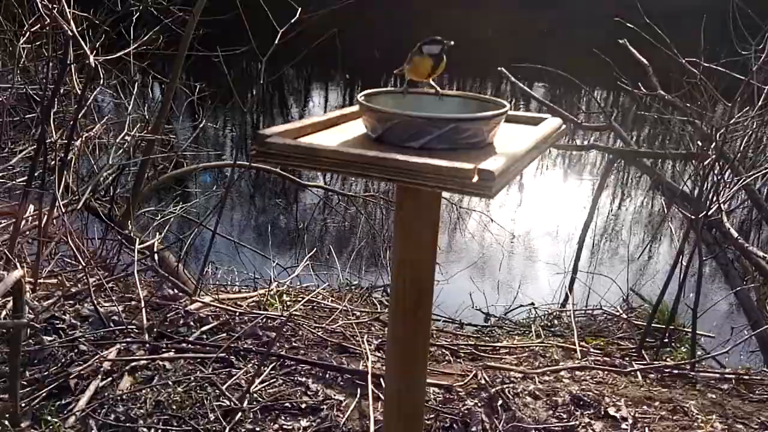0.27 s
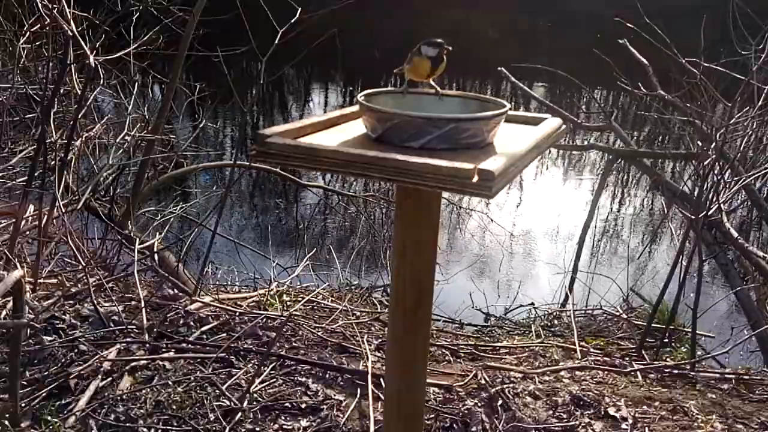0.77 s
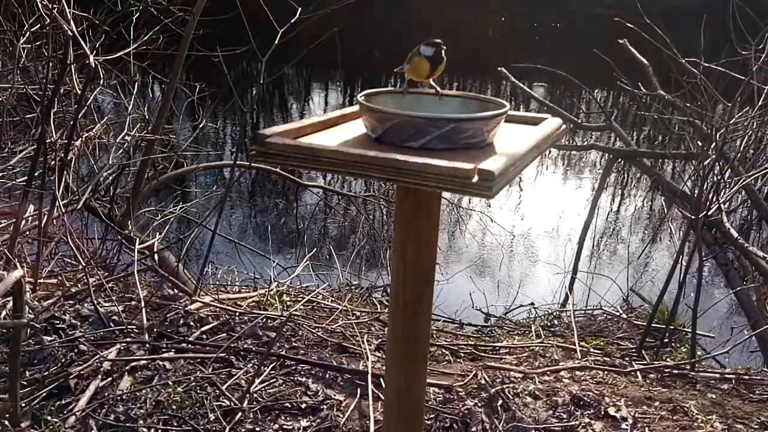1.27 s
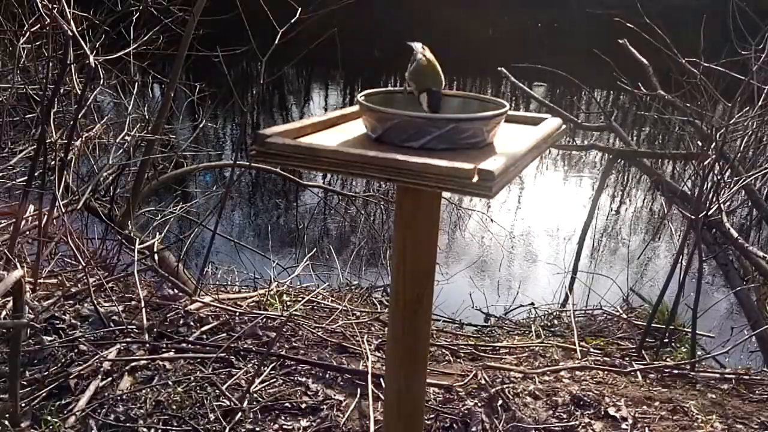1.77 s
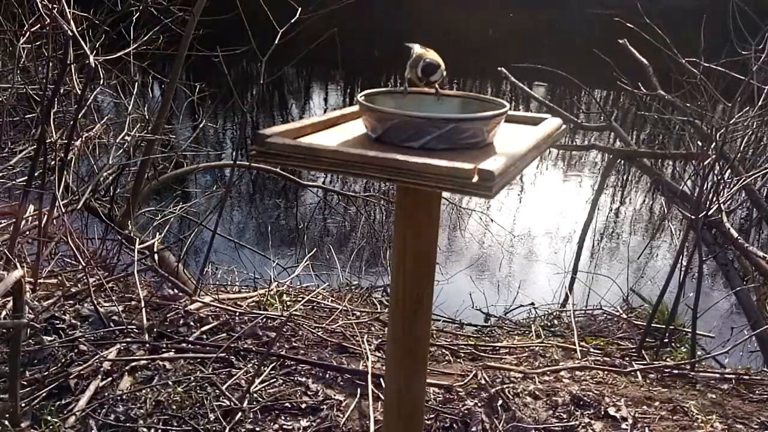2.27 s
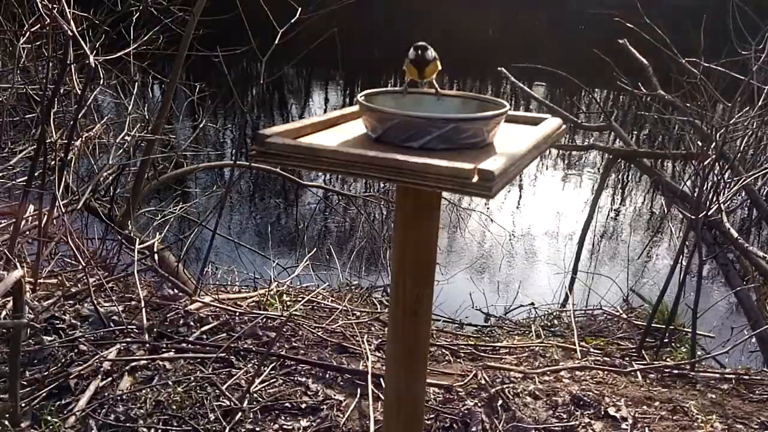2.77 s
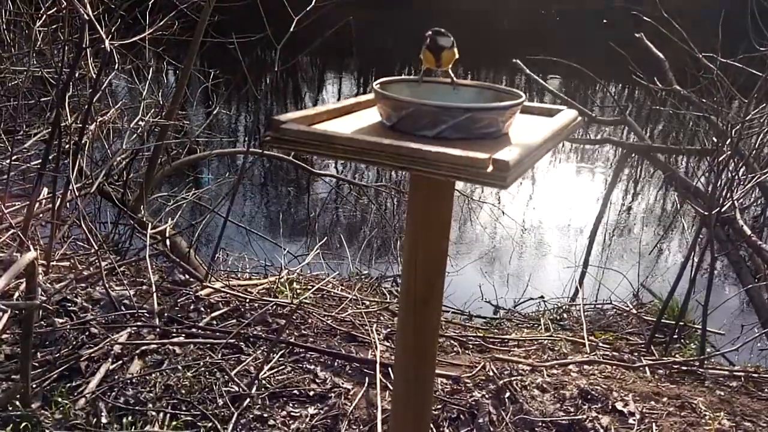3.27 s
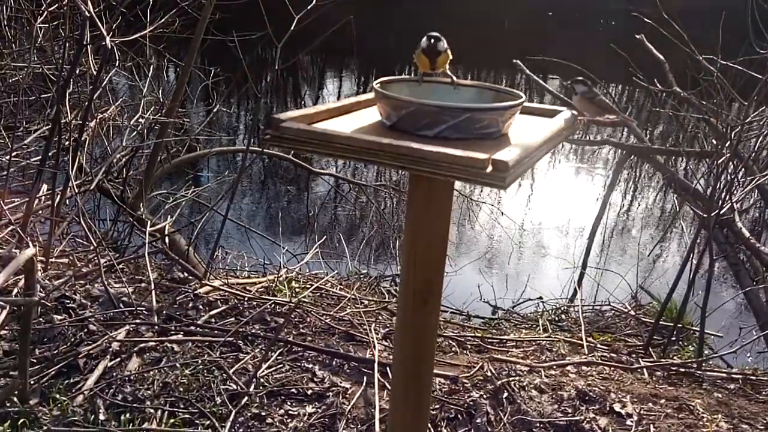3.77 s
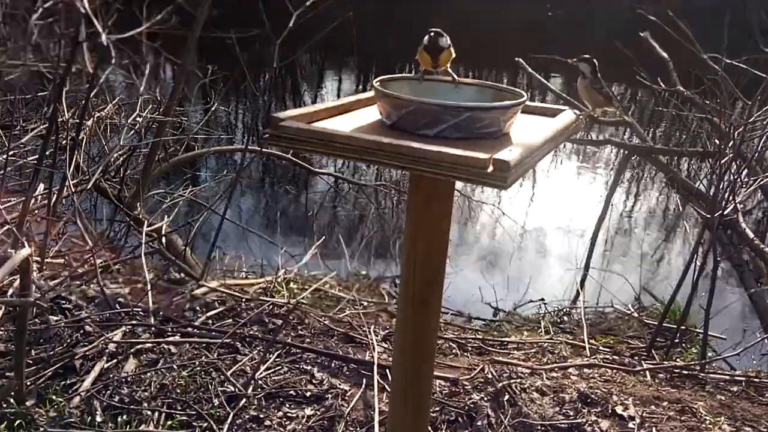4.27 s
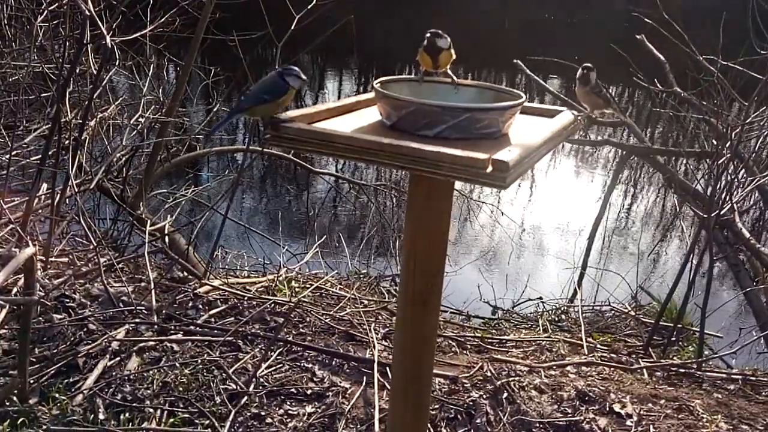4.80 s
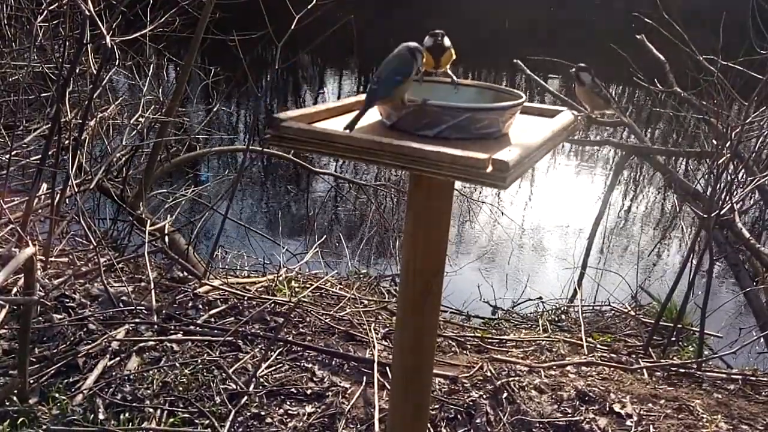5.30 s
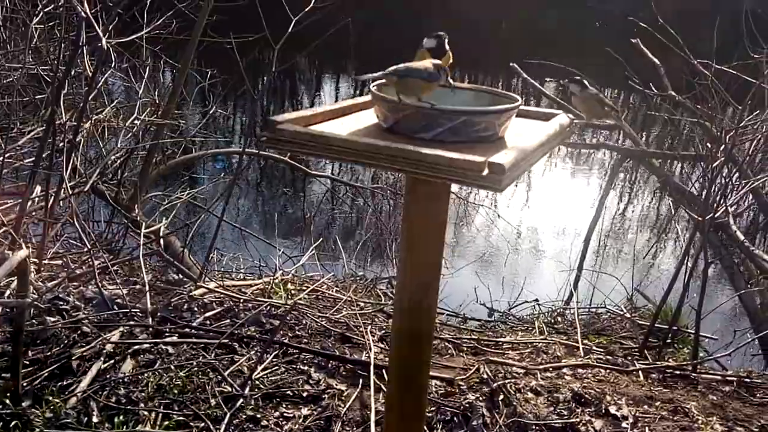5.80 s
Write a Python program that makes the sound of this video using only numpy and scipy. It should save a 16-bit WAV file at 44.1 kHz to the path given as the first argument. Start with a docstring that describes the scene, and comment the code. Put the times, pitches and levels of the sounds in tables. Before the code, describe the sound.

Outdoors by water, a steady, distant low roar lies beneath everything. Faint thin bird calls slur downward from far bushes during the first second. Near three seconds a close wing flutter thumps the microphone and taps ring a seed-filled bowl. Softer wings stir in twigs, a clear chirp follows, then ticking claws and a dense, loud burst of feather snaps and air thuds end it.

```python
"""A wooden feeder with a ceramic seed bowl beside a river, visited by small birds.
Twice a bird flutters close by: feathers snap and rustle as dense clicks through damped resonances,
and wing wash thumps the microphone with single puffs and noisy eddies.
Beaks and claws tick on seed and ring the modes of the bowl; gliding tones make a few thin calls.
Softer wings stir among the twigs, over a distant outdoor roar of shaped noise."""
import sys
import numpy as np
from scipy import signal
from scipy.fft import rfft, irfft
from scipy.io import wavfile
from scipy.ndimage import uniform_filter1d

SR = 44100
rng = np.random.default_rng(int(sys.argv[2]) if len(sys.argv) > 2 else 0)


def unload_wav(signal):
    """Save mono or channel-first audio to the path in sys.argv[1] as 16-bit WAV at rate SR, clipped to [-1, 1]."""
    wavfile.write(
        sys.argv[1],
        SR,
        np.round(np.clip(np.atleast_2d(signal).T, -1, 1) * 32767).astype(np.int16),
    )


N = 266672
TIME = np.arange(N) / SR


def amp(db):
    """Decibels to gain."""
    return 10 ** (np.asarray(db) / 20)


def unit(x):
    """Scales to rms 1."""
    return x / np.sqrt(np.mean(x ** 2) + 1e-20)


def smooth_noise(shape, size, axis=-1):
    """Noise slowed down by a moving average over size samples."""
    return uniform_filter1d(rng.standard_normal(shape), size=size, axis=axis)


def spectrum(points, hz):
    """Reads a spectrum in dB on a log-frequency axis."""
    point_hz, db = np.transpose(points)
    return np.interp(np.log(hz + 1), np.log(point_hz), db)


def colour(x, points):
    """Gives a signal a spectrum, at rms 1."""
    gain = amp(spectrum(points, np.fft.rfftfreq(len(x), 1 / SR)))
    return unit(irfft(rfft(x) * gain, len(x)))


def band(hz, width_hz):
    """A bell-shaped band of noise, at rms 1."""
    f = np.fft.rfftfreq(N, 1 / SR)
    bell = np.exp(-((f - hz) / width_hz) ** 2)
    return unit(irfft(rfft(rng.standard_normal(N)) * bell, N))


def add(mix, start_s, sound):
    """Mixes a sound in at a time."""
    part = mix[max(round(start_s * SR), 0):][:len(sound)]
    part += sound[:len(part)]


def thicket(x, t60_s):
    """Sparse echoes scattered back from twigs and ground."""
    t = np.arange(SR // 2) / SR
    hits = rng.random(len(t)) < 2500 / SR  # about 2500 echoes a second
    echoes = rng.standard_normal(len(t)) * hits * amp(-60 * t / t60_s) * (t > .004)
    return signal.fftconvolve(x, echoes / np.linalg.norm(echoes))[:N]


def strokes(rows, drop_db=20, roundness=1.34):
    """Each stroke swells to its peak and fades; swell_s and fade_s are the times to change by drop_db."""
    power = np.full(N, 1e-16)
    for peak_s, level_db, swell_s, fade_s in rows:
        away = np.maximum((peak_s - TIME) / swell_s, (TIME - peak_s) / fade_s)
        # roundness 1 gives a pointed peak, 2 a bell
        power += amp(level_db - drop_db * np.minimum(away, 10) ** roundness) ** 2
    return np.sqrt(power)


def rustle(rows, points, grain_db, grains_per_s, flick_db, patchy_db=3.5):
    """Surfaces catch and slip: dense uneven clicks, clumped into flicks that each favour other pitches."""
    flicks = unit(uniform_filter1d(smooth_noise(N, 200), size=200))
    uneven_db = grain_db * np.minimum(rng.exponential(1, N), 4)
    size = amp(uneven_db + flick_db * np.clip(flicks, -2, 2))
    slips = rng.standard_normal(N) * size * (rng.random(N) < grains_per_s / SR)
    # patches in time and frequency colour the flicks differently
    z = signal.stft(slips, nperseg=256)[2]
    patches = unit(uniform_filter1d(smooth_noise(z.shape, 4, axis=0), size=7, axis=1))
    slips = signal.istft(z * amp(patchy_db * patches), nperseg=256)[1][:N]
    return strokes(rows) * colour(slips, points)


# tone of the distant roar and low rumble: pitch_hz [Hz], relative density_db [dB per Hz]
ROAR_COLOUR = [(20, -11), (35, -12.5), (62, 2), (100, -2), (160, -11.5), (340, -18), (600, -15),
               (1000, -14.5), (1800, -23), (3000, -43), (4200, -47), (6200, -50), (8200, -61),
               (13800, -63.5)]
# slow drift of the roar: time_s [s], gain_db [dB]
ROAR_SWELL = [(0, -1), (1.9, 0.5), (3.5, 0), (6.05, -2)]


def background(roar_db=-45.5, drone_hz=485, drone_db=-60, hiss_db=-91):
    """A far roar with a faint drone in it, and a thin hiss at the very top, all shaped from noise."""
    roar = amp(roar_db) * colour(rng.standard_normal(N), ROAR_COLOUR)
    drone = amp(drone_db) * band(drone_hz, 28)
    time_s, gain_db = np.transpose(ROAR_SWELL)
    swell = amp(np.interp(TIME, time_s, gain_db))
    return swell * (roar + drone) + amp(hiss_db) * band(15000, 650)


# thin falling calls from the far bushes: start_s [s], length_s [s], start_hz [Hz], end_hz [Hz],
# level_db [dB], echo_db [dB against the call]
FAR_CALLS = [(0.059, 0.0046, 7800, 5300, -68.5, 4), (.07, .11, 8700, 8400, -92, -8),
             (.16, .025, 8350, 7360, -81, -3), (0.287, .11, 8260, 8040, -88, -4),
             (0.469, .055, 6900, 5480, -75.5, 3.5), (0.608, 0.042, 6380, 5130, -74, 1),
             (0.736, 0.053, 6400, 4410, -77, 3.5), (.79, 0.037, 5600, 5500, -81, 0),
             (4.322, 0.037, 5020, 4930, -75, -10)]


def far_calls(waver=0.019):
    """Short, slightly unsteady downward slurs; the deeper in the bushes, the more echo."""
    out = np.zeros(N)
    for start_s, length_s, start_hz, end_hz, level_db, echo_db in FAR_CALLS:
        hz = np.geomspace(start_hz, end_hz, int(length_s * SR))
        hz = hz * (1 + waver * unit(smooth_noise(len(hz), 60)))
        tone = np.sin(2 * np.pi * np.cumsum(hz) / SR)
        note = amp(level_db) * unit(tone * signal.windows.tukey(len(hz), .4))
        add(out, start_s, note)
        add(out, start_s, amp(echo_db) * thicket(note, t60_s=0.39))
    return out


# birds fluttering among the twigs: peak_s [s], level_db [dB], swell_s [s], fade_s [s]
TWIG_STROKES = [(2.80, -68.5, 0.16, 0.11), (3.53, -53.5, 0.012, 0.038), (3.57, -68.5, .03, .21),
                (4.343, -70, .028, .025), (4.667, -61, .028, .045), (4.81, -73, .04, .06)]
# tone of those wings: pitch_hz [Hz], relative density_db [dB per Hz]
TWIG_COLOUR = [(500, -23), (2500, 3), (5200, -2.5), (7000, 2.5), (8500, -16), (13000, -19), (15000, -16.5),
               (16500, -10)]


def twig_flutter():
    """Wings farther off among the twigs: a softer, smoother run of feather slips."""
    return rustle(TWIG_STROKES, TWIG_COLOUR, grain_db=2.0, grains_per_s=13000, flick_db=3.5)


# near calls: start_s [s], length_s [s], start_hz [Hz], held_hz [Hz],
# end_level_db [dB, before gate and off-note loss], overtone_boost_db [dB]
NEAR_CALLS = [(4.62, .021, 6280, 6230, -44, -5), (4.637, 0.011, 6500, 7000, -53, -6),
              (4.644, 0.018, 4400, 3560, -52.5, 9), (4.775, 0.072, 2700, 4183, -39.5, -0.5)]
# partials of a near call: multiple [times the pitch], relative level_db [dB, before the boost]
CALL_PARTIALS = [(1, 1), (2, -15), (3, -25)]


def near_calls(waver=0.0041, glide_s=0.0048, sag_hz_per_s=1750,
               attack_s=.002, swell_db_per_s=110, release_s=0.0078):
    """Clean whistles with overtones: each slides onto its note, swells and sags."""
    out = np.zeros(N)
    for start_s, length_s, start_hz, held_hz, end_level_db, boost_db in NEAR_CALLS:
        t = np.arange(0, length_s, 1 / SR)
        glide = (start_hz - held_hz) * np.exp(-(t / glide_s) ** 2)
        hz = held_hz + glide - sag_hz_per_s * t
        hz = hz * (1 + waver * unit(smooth_noise(len(t), 100)))
        phase = 2 * np.pi * np.cumsum(hz) / SR
        tone = np.zeros(len(t))
        for multiple, level_db in CALL_PARTIALS:
            gain = amp(level_db + boost_db * (multiple > 1))
            beak_loss = 1 + (multiple * hz / 11500) ** 12  # the beak radiates little above 11 kHz
            tone += gain * np.sin(round(multiple) * phase) / beak_loss
        gate = np.minimum(t / attack_s, 1) * np.minimum((length_s - t) / release_s, 1)
        off_note_db = -22 * abs(np.log2(hz / held_hz))  # the throat is tuned to the held note
        swell_db = swell_db_per_s * (t - length_s)
        add(out, start_s, amp(end_level_db + off_note_db + swell_db) * gate * unit(tone))
    return out


# taps on the bowl: start_s [s], drive_db [dB], drive_hz [Hz around which the contact drives it most]
BOWL_TAPS = [(3.0010, -27, 6340), (3.0012, -34.5, 3060), (3.0412, -33.5, 4900), (3.0408, -39.5, 2100),
             (3.0738, -37, 4800)]
# modes of the seed-filled bowl: mode_hz [Hz], relative mode_db [dB], t60_s [s]
BOWL_MODES = [(2130, -0.5, 0.048), (2659, -3, .032), (3060, 1.5, 0.016), (4780, -6.5, 0.025),
              (5760, 1.5, 0.01), (6400, 1.5, 0.006)]


def bowl(focus_db_per_octave=30, rise_s=0.0004):
    """Taps ring the modes of the bowl, damped by the seed; each contact favours other modes."""
    out, t = np.zeros(N), np.arange(SR // 10) / SR
    for start_s, drive_db, drive_hz in BOWL_TAPS:
        ring = np.zeros(len(t))
        for mode_hz, mode_db, t60_s in BOWL_MODES:
            off_drive_db = focus_db_per_octave * abs(np.log2(mode_hz / drive_hz))
            ring += amp(mode_db - off_drive_db - 60 * t / t60_s) * np.sin(2 * np.pi * mode_hz * t)
        add(out, start_s, amp(drive_db) * ring * (1 - np.exp(-t / rise_s)))
    return out


# single puffs of wing wash on the microphone: centre_s [s], peak_db [dB, before the port], pitch_hz [Hz]
WASH_PUFFS = [(2.9020, -29, 70), (2.9374, -10.5, 105), (2.9706, -12, 340), (2.9875, -12, 95),
              (3.0215, -24, 70), (5.9875, -14, 90), (6.0445, -14, 120)]
# gusts of eddies thrown at the microphone: peak_s [s], level_db [dB], swell_s [s], fade_s [s]
WASH_GUSTS = [(2.94, -29.5, 0.047, 0.043), (2.971, -19, .011, .034), (3.008, -30, .02, 0.057),
              (3.10, -37, .02, 0.049), (5.91, -33.5, 0.15, 0.15), (5.988, -21, 0.031, 0.1),
              (6.04, -19.5, 0.042, 0.15)]


def wing_wash(low_hz=82, front=2.34, rest_hz=80, hz_per_gain=3760, port_hz=(44.5, 640)):
    """Each puff is a push that flips steeply into a pull; eddies are brighter when the air moves faster."""
    speed = strokes(WASH_GUSTS)
    edge_hz = rest_hz + hz_per_gain * speed
    eddies, puffs = np.zeros(N), np.zeros(N)
    for hz in np.geomspace(low_hz, 1400, num=10):
        eddies += band(hz, hz / 3) / np.sqrt(1 + (hz / edge_hz) ** 7)
    even_eddies = eddies / np.sqrt(uniform_filter1d(eddies ** 2, size=800))
    for centre_s, peak_db, pitch_hz in WASH_PUFFS:
        u = 2 * np.pi * pitch_hz * (TIME - centre_s)
        puff = -np.tanh(front * u) * np.exp(-u ** 2 / 2)
        puffs += amp(peak_db) * puff / abs(puff).max()
    # the microphone passes no steady pressure, and the front of a puff is blunt
    port = signal.butter(2, port_hz, "bandpass", fs=SR, output="sos")
    return signal.sosfilt(port, puffs) + speed * even_eddies


# strokes of close wings: peak_s [s], level_db [dB], swell_s [s], fade_s [s]
CLOSE_STROKES = [(2.885, -63, 0.03, 0.1), (2.944, -39.5, 0.014, 0.02), (3.0, -60.5, .03, .12),
                 (3.297, -47, .011, 0.013), (3.318, -54, .01, 0.034), (5.50, -62, .07, 0.14),
                 (5.707, -46, 0.0093, .05), (5.765, -37, .005, .005), (5.812, -34, .013, .02),
                 (5.824, -32, .012, .008), (5.853, -23.5, .022, .009), (5.875, -31.5, .01, .007),
                 (5.9, -59, .02, .24)]
# tone of close feathers: pitch_hz [Hz], relative density_db [dB per Hz]
FEATHER_COLOUR = [(300, -14.5), (1000, -7.5), (2500, 0.5), (4500, -3), (7000, -4.5), (9000, -10.5),
                  (11000, -18), (13500, -35.5), (15200, -17.5), (16500, -32)]


def close_feathers():
    """Close wings crackle as feathers slide over each other in uneven slips."""
    return rustle(CLOSE_STROKES, FEATHER_COLOUR, grain_db=3.5, grains_per_s=11000, flick_db=4.5)


# dry snaps of feathers, claws and beaks: start_s [s], level_db [dB over the loudest millisecond],
# low_hz [Hz, lower resonance], high_hz [Hz, upper resonance], high_db [dB, upper against lower],
# length_s [s, decay of the scrape]
DRY_SNAPS = [(2.9381, -21, 3750, 6500, -9, .0011), (2.9417, -25, 3150, 5600, -8, 0.002),
             (2.9548, -47, 3230, 5170, 2, .001), (2.9618, -33, 6680, 9200, 7, 0.00072),
             (3.295, -38, 4060, 7900, -2, 0.0021), (3.312, -31.5, 4820, 8440, 11, 0.00055),
             (3.3165, -33, 4470, 8350, -1, .0003), (3.3206, -30, 4650, 7540, -6, .0002),
             (3.526, -41.5, 2330, 7000, 5, 0.0039), (3.933, -49.5, 2520, 4260, -12, 0.00092),
             (4.045, -38.5, 2480, 4700, -22, .0005), (5.343, -67, 5900, 8440, 3, .001),
             (5.364, -63, 7280, 9470, -6, .001), (5.445, -58, 7110, 9350, 19, .001),
             (5.4648, -49, 3750, 8350, -3, .001), (5.4825, -29, 2190, 3540, 14, 0.00043),
             (5.4865, -41, 4070, 8660, 11, .0037), (5.496, -31, 2090, 6550, -1, .0006),
             (5.5143, -30.5, 4520, 8610, 10, 0.00055), (5.5213, -32.5, 4200, 6550, -10, 0.0012),
             (5.714, -26, 3600, 7060, -3, 0.0016), (5.7227, -16.5, 3550, 6630, -2, .0004),
             (5.7249, -17, 3550, 8830, 22, .0009), (5.7342, -26, 4100, 8660, 8, .0003),
             (5.7367, -21, 5470, 7750, -14, .0006), (5.7565, -28, 4780, 7490, -1, 0.00046),
             (5.7594, -17, 5000, 7200, -19, 0.00057), (5.7777, -42, 1920, 4050, -8, .0003),
             (5.783, -40, 1800, 8180, -7, .0004), (5.7906, -16, 6560, 8800, 8, 0.00072),
             (5.796, -23.5, 3360, 6330, 7, 0.0014), (5.8242, -23, 6700, 8500, 1, 0.0014),
             (5.8452, -15, 2840, 8310, -16, 0.00073), (5.851, -22.5, 2920, 4570, -13, 0.0039),
             (5.8593, -25, 4260, 6550, -5, .0008), (5.8781, -27, 4140, 8830, -7, .0004),
             (5.932, -45, 1940, 3010, -9, 0.0034)]
# tone common to the snaps: pitch_hz [Hz], relative gain_db [dB]
SNAP_TONE = [(200, -16.5), (800, -2), (1500, 4.5), (3000, -1), (6500, 0), (9000, -4.5), (11000, -9),
             (13000, -15), (15200, -3), (17000, -13)]


def snaps(focus_db=17, width=0.055, scrape=0.53, rise_s=0.00029, size=1024):
    """Each snap builds up, lets go and scrapes on briefly, ringing two heavily damped resonances."""
    out, hz = np.zeros(N), np.fft.rfftfreq(size, 1 / SR)
    t = (np.arange(size) - size // 8) / SR  # lets go at t = 0

    def resonance(centre_hz):
        """A peak that falls away on both sides of its centre."""
        return amp(-focus_db * np.log10(1 + ((hz - centre_hz) / (width * centre_hz)) ** 2) / 2)

    for start_s, level_db, low_hz, high_hz, high_db, length_s in DRY_SNAPS:
        gain = resonance(low_hz) + amp(high_db) * resonance(high_hz)
        gain = gain * amp(spectrum(SNAP_TONE, hz))
        log_gain = np.log(np.r_[gain, gain[-2:0:-1]])
        causal = np.exp(np.conj(signal.hilbert(log_gain)))[:len(hz)]  # rings only after the push
        envelope = np.exp(np.minimum(t / rise_s, -t / length_s))
        force = (t == 0) + scrape * rng.standard_normal(size) * envelope
        snap = irfft(rfft(force) * causal)
        loudest_ms = np.sqrt(uniform_filter1d(snap ** 2, size=44, mode="constant").max())
        add(out, start_s + t[0], amp(level_db) * snap / loudest_ms)
    return out


def scene(echo_db=-25, call_echo_db=-24):
    """Near sounds are almost dry; the bushes return a faint, short echo."""
    far = background() + far_calls()
    calls = near_calls()
    contacts = twig_flutter() + bowl() + close_feathers() + snaps()
    call_echo = amp(call_echo_db) * thicket(calls, t60_s=0.22)
    contact_echo = amp(echo_db) * thicket(contacts, t60_s=0.18)
    return (far + calls + call_echo + wing_wash() + contacts + contact_echo)[None]


def record(dry, edge_hz=16400):
    """The recorder's band limit: a steep low-pass."""
    low_pass = signal.firwin(255, edge_hz, window=("kaiser", 9), fs=SR)
    return signal.oaconvolve(dry, low_pass[None], "same")


dry = scene()
out = record(dry)
unload_wav(out)
```